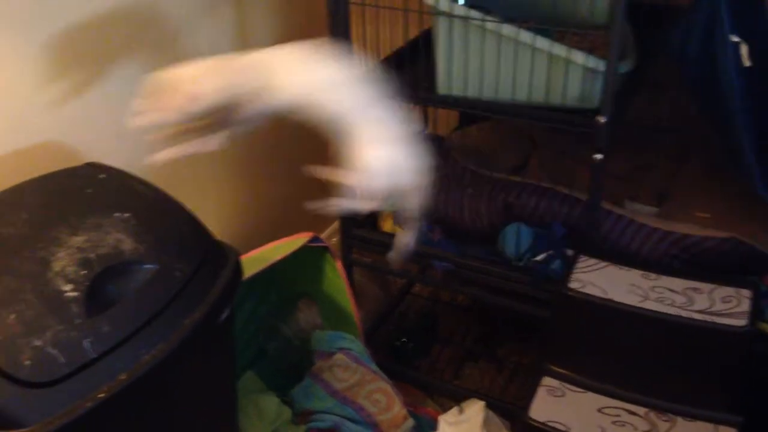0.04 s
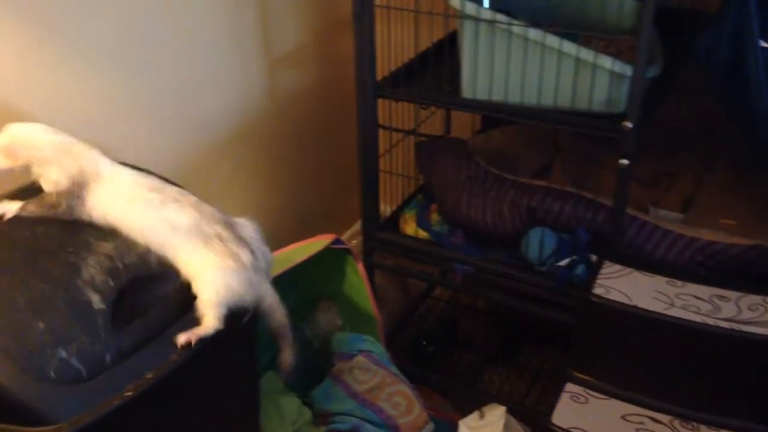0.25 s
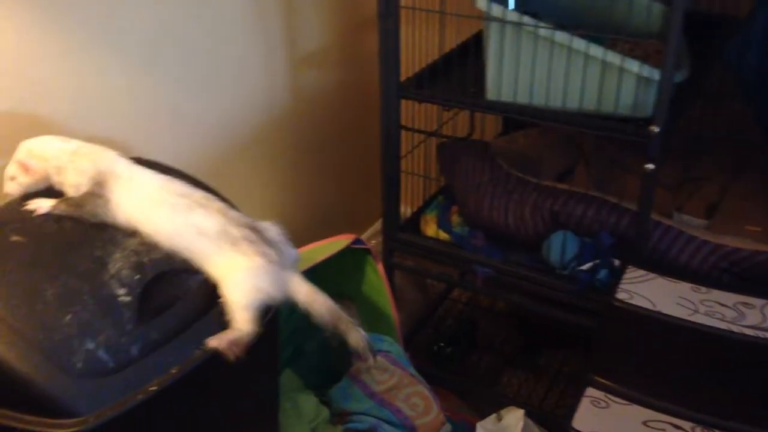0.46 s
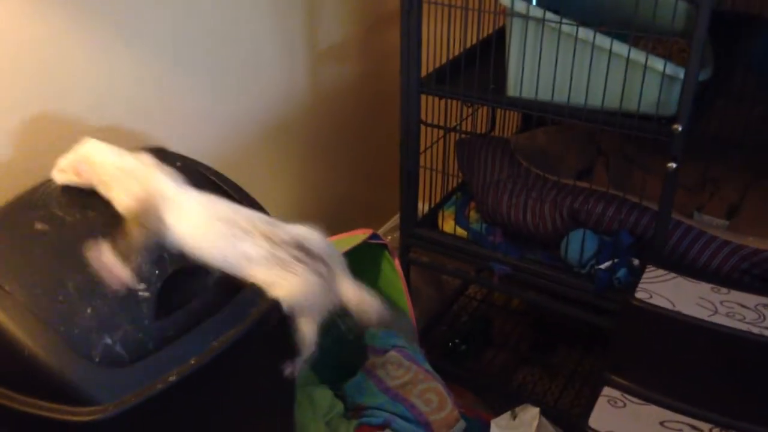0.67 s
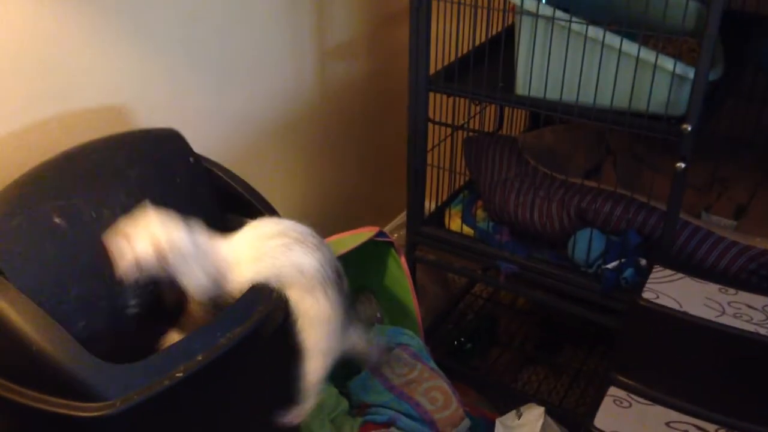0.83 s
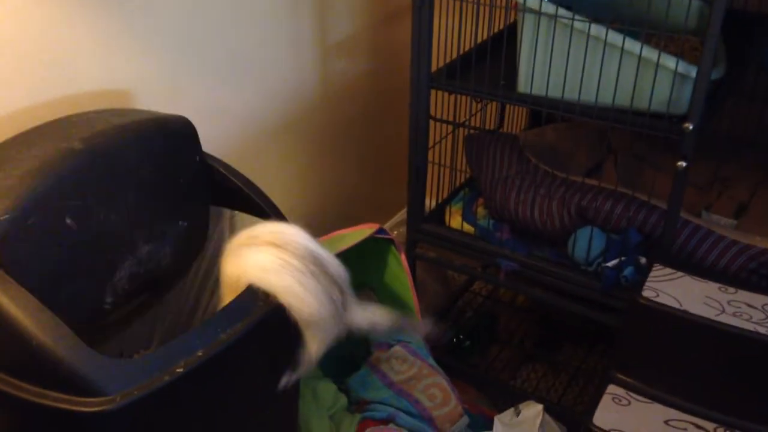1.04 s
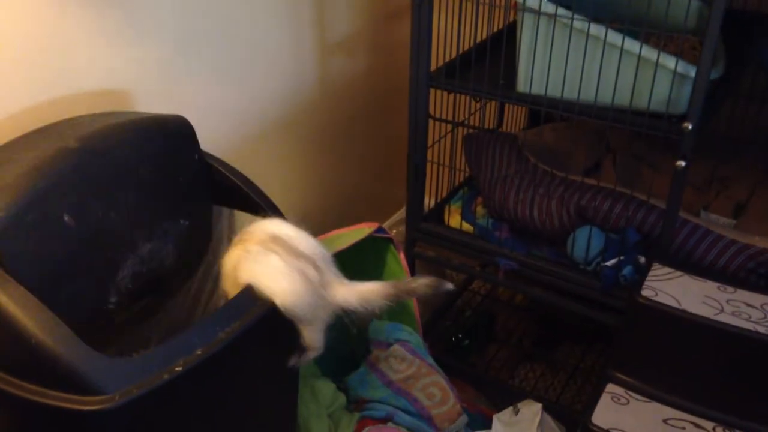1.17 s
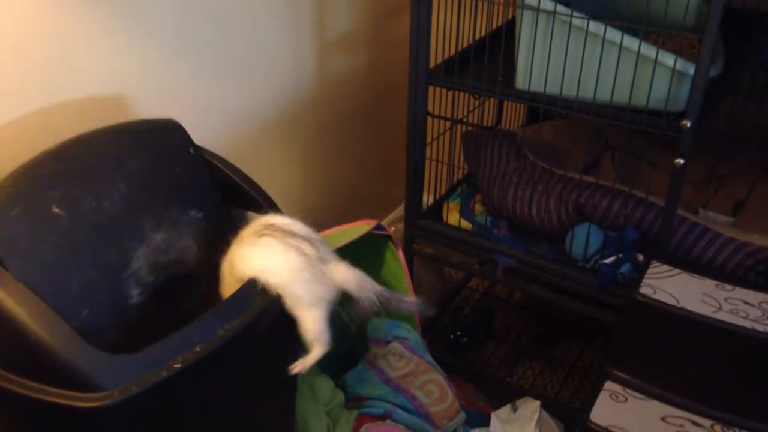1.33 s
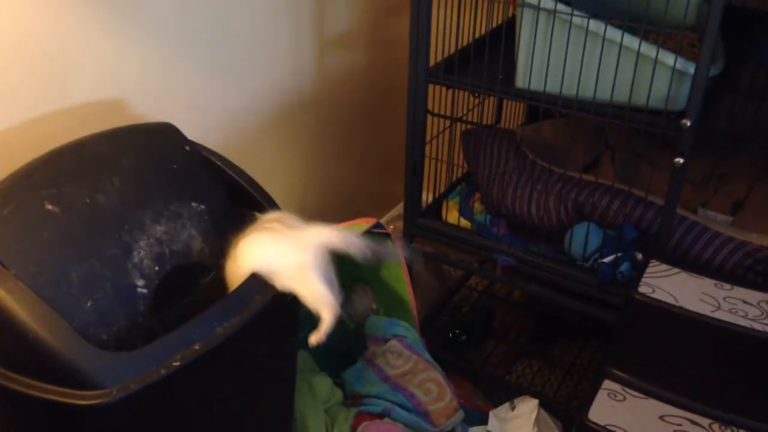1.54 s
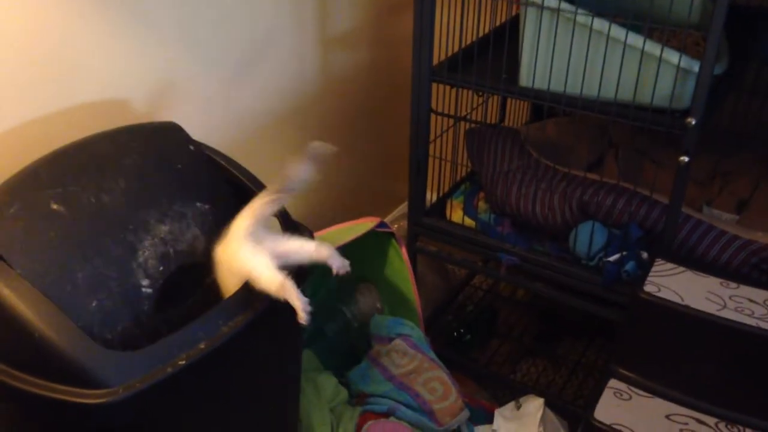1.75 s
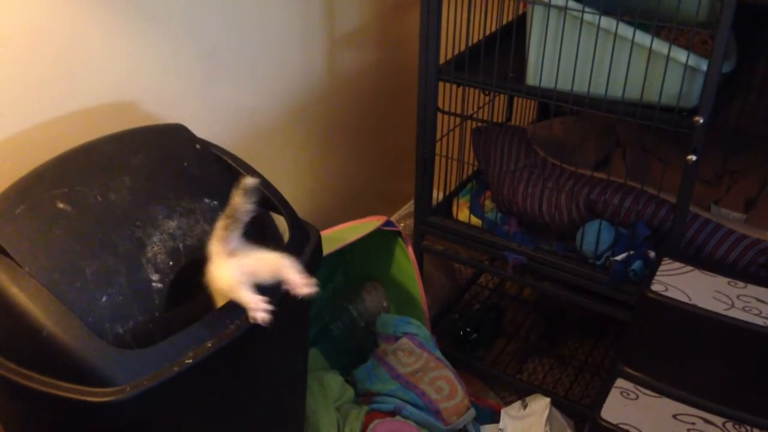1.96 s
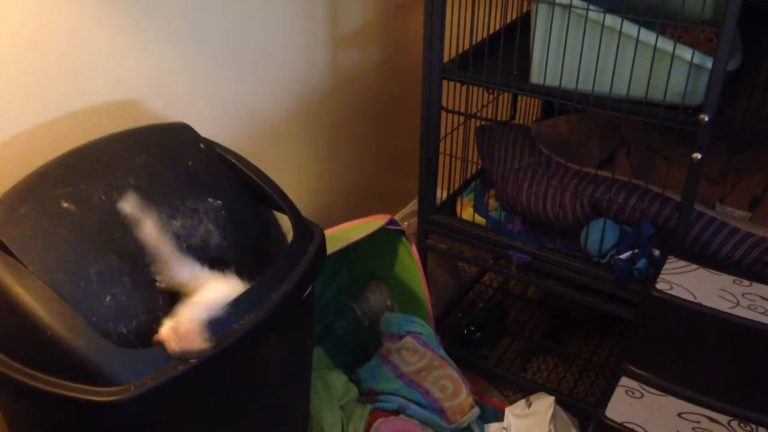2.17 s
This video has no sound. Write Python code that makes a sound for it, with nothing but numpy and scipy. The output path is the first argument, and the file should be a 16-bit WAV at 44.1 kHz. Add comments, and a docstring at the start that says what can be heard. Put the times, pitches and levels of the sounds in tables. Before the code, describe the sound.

Hollow knocks on a plastic bin as a ferret scrambles inside, claws ticking and fur rustling.

```python
"""In a small, quiet room, a ferret lands on a plastic bin, pushes through its swinging lid
and slides inside. Fur and liner rustle along the plastic, and claws tick, scrape and squeak.
Paws, body and lid knock the hollow shell, which rings while the loose lid rattles.
The microphone is close, and the walls add short echoes."""
import sys
import numpy as np
from scipy import signal
from scipy.fft import rfft, irfft
from scipy.io import wavfile
from scipy.ndimage import uniform_filter1d

SR = 44100
rng = np.random.default_rng(int(sys.argv[2]) if len(sys.argv) > 2 else 0)


def waveform_to_disk(signal):
    """Save audio, clipped to [-1, 1], as 16-bit WAV at the path in sys.argv[1]."""
    frames = np.transpose(np.atleast_2d(signal))
    scaled = np.clip(frames, -1, 1) * 32767
    samples = np.round(scaled).astype(np.int16)
    wavfile.write(sys.argv[1], SR, samples)


N = 97020  # 2.2 s
PANEL_HZ = 300  # panel fade times are given at this pitch; higher panels die away sooner


def amp(db):
    """Turns decibels into a number to multiply a sound by."""
    return 10 ** (np.asarray(db) / 20)


def unit(x):
    """Scales a sound to an average strength (rms) of 1."""
    return x / np.sqrt(np.mean(x ** 2) + 1e-20)


def read(points, hz):
    """Looks up a frequency in a table, blending between rows on a pitch (log) scale."""
    f, value = np.transpose(points)
    return np.interp(np.log(hz + 1), np.log(f), value)


def add(mix, s, sound):
    """Mixes a sound in, starting at s seconds."""
    part = mix[max(round(s * SR), 0):][:len(sound)]
    part += sound[:len(part)]


def colour(x, spectrum):
    """Shapes the lows and highs of a sound by a table, at strength 1."""
    gain = amp(read(spectrum, np.fft.rfftfreq(N, 1 / SR)))
    return unit(irfft(rfft(x) * gain, N))


def grains(per_s, spread_db):
    """Tiny clicks of uneven size, made as one surface slips over another."""
    clicks = rng.standard_normal(N) * (rng.random(N) < per_s / SR)
    return clicks * amp(spread_db * np.minimum(rng.exponential(1, N), 4))


def burst(hz, t, width_oct, skirt_db):
    """Noise gathered around one pitch, with a wide skirt of lower and higher sound."""
    octaves = np.log2((np.fft.rfftfreq(len(t), 1 / SR) + 1) / hz)
    peak = np.exp(-.5 * (octaves / width_oct) ** 2)
    skirt = amp(skirt_db - 10.5 * np.maximum(abs(octaves) - 1, 0))
    phases = np.exp(2j * np.pi * rng.random(len(peak)))
    return unit(irfft((peak + skirt) * phases, len(t)))


def rubbing():
    """Fur and liner hiss along the lid, over the rougher drag of the body on the shell."""
    # tone of the fur and liner: f/Hz, level/dB
    fur_tone = [(800, -22), (2500, -2.5), (4200, 1), (7500, -0.5), (10500, -4), (15000, -7.5)]
    # how their hiss swells and fades: t/s, level/dB
    fur_levels = [(0, -56), (.14, -67), (.215, -52.5), (.225, -42.5), (.29, -41), (.355, -51),
                  (.385, -44.5), (.45, -64), (.54, -60.5), (.585, -46.5), (.645, -39), (.725, -46.5),
                  (.78, -44), (.865, -37), (.905, -43.5), (.945, -37), (.975, -46.5), (1.02, -39.5),
                  (1.06, -43.5), (1.09, -54), (1.5, -63), (1.6, -59), (1.69, -49.5), (1.72, -64.5),
                  (1.88, -70.5), (1.935, -59), (2.0, -69.5), (2.03, -57), (2.08, -56.5), (2.12, -72)]
    # tone of the dragging body: f/Hz, level/dB
    drag_tone = [(90, 4), (200, 12.5), (450, 13.5), (1100, 13), (2000, 13), (3200, 7), (6000, -1),
                 (14000, -35)]
    # how the drag swells and fades: t/s, level/dB
    drag_levels = [(.15, -68), (.21, -58), (.23, -39.5), (.31, -42), (.54, -74.5), (.555, -43), (.62, -49),
                   (.79, -46), (.87, -42), (.905, -45.5), (.945, -45), (.975, -49), (1.02, -42.5),
                   (1.05, -49.5), (1.1, -50.5), (1.25, -58), (1.35, -52), (1.495, -59), (1.535, -41),
                   (1.59, -55.5), (1.88, -58.5), (2.165, -65.5), (2.178, -55)]
    t = np.arange(N) / SR
    fur = colour(grains(per_s=13000, spread_db=-2.5), fur_tone)
    drag = colour(grains(per_s=3500, spread_db=1.5), drag_tone)
    fur_gain = amp(np.interp(t, *np.transpose(fur_levels)) + 0.5)
    drag_gain = amp(np.interp(t, *np.transpose(drag_levels)) - 1)
    return fur * fur_gain + drag * drag_gain


def claws():
    """Claws tick on the plastic: bursts of noise that start sharply and fade fast."""
    # ticks and scratches: t/s, level/dB, brightest f/Hz, fade time/s
    ticks = [(.049, -40, 6000, 0.0012), (0.222, -15.5, 6640, 0.00067), (0.2391, -31, 2560, 0.0037),
             (0.487, -45, 3360, 0.011), (0.5672, -18, 4200, 0.0012), (0.7834, -18, 2180, 0.0011),
             (0.8606, -22, 4900, 0.0011), (1.283, -34.5, 1630, 0.0079), (1.387, -42, 5470, 0.005),
             (1.5094, -34.5, 1820, 0.0024), (1.5216, -37.5, 2040, 0.019), (1.767, -45, 3630, 0.01),
             (1.8, -47.5, 3300, 0.0077), (2.019, -37.5, 5030, 0.0038)]
    rise_s = 0.00075
    t, out = np.arange(SR // 8) / SR, np.zeros(N)
    for s, db, hz, decay in ticks:
        envelope = np.exp(-t / decay) * (1 - np.exp(-t / rise_s))
        add(out, s, amp(db) * burst(hz, t, width_oct=0.33, skirt_db=-6.5) * envelope)
    return out


def blows(rows, rise_cycles, decay_s, rattle_db):
    """Each blow bends one panel back and forth for a moment and rattles the loose lid."""
    rattle_fade_s = 0.016
    t, out = np.arange(SR // 4) / SR, np.zeros(N)
    for s, db, hz in rows:
        rise = 1 - np.exp(-t * hz / rise_cycles)
        fade = np.exp(-t * np.sqrt(hz / PANEL_HZ) / decay_s)
        flex = np.sin(2 * np.pi * hz * t) * rise * fade
        rattle = burst(hz, t, width_oct=0.7, skirt_db=3) * rise * np.exp(-t / rattle_fade_s)
        add(out, s, amp(db) * (flex / abs(flex).max() + amp(rattle_db) * rattle))
    return out


def knocks():
    """Paws, lid and body strike the bin; softer blows build up and fade more slowly."""
    # hard knocks of paws and lid: t/s, level/dB, panel f/Hz
    hard_hits = [(0.157, -45, 293), (0.2125, -28, 360), (.2275, -27.5, 700), (.246, -27.5, 345),
                 (.286, -23, 373), (.308, -30, 424), (.601, -23, 340), (.612, -26.5, 864), (.660, -30, 268),
                 (.755, -28, 440), (.784, -24.5, 633), (.848, -27.5, 1070), (1.0768, -21, 340),
                 (1.0835, -27, 352), (1.0915, -21.5, 557), (1.1012, -33, 576), (1.510, -24.5, 470),
                 (1.5163, -33, 505), (1.525, -28.5, 1040), (1.5313, -30.5, 650), (1.536, -28, 360),
                 (1.5495, -40, 520), (2.020, -34, 410)]
    # soft bumps of the body: t/s, level/dB, panel f/Hz
    body_bumps = [(.238, -28.5, 150), (.275, -28, 100), (.319, -28.5, 191), (.614, -34, 234),
                  (.655, -39, 88), (.878, -42.5, 145), (1.119, -34.5, 263), (1.534, -34.5, 135),
                  (1.682, -43, 460), (1.9225, -27.5, 238), (1.963, -36, 224), (1.986, -41.5, 504)]
    # round taps of a paw pad: t/s, level of each of two layers/dB, panel f/Hz
    pad_taps = [(.4855, -36, 518), (1.246, -44, 450), (1.8015, -43, 950)]
    out = blows(hard_hits, rise_cycles=0.15, decay_s=0.0029, rattle_db=-12)
    out += blows(body_bumps, rise_cycles=0.99, decay_s=0.0053, rattle_db=-6)
    for _ in range(2):
        out += blows(pad_taps, rise_cycles=0.7, decay_s=0.0045, rattle_db=-17)
    return out


def shell(hits):
    """The hollow shell adds its own ringing notes to every hit."""
    # notes of the shell: f/Hz, level before the high notes are lifted/dB
    notes = [(101, -13), (130, 0), (175, 0), (232, 7.5), (280, 7.5), (366, 8), (474, 4), (520, 3.5),
             (615, 9), (735, 8.5), (1040, 5.5)]
    ring_s = 0.077  # time for the low notes to fall by 60 dB
    t, ring = np.arange(SR // 2) / SR, np.zeros(SR // 2)
    for hz, db in notes:
        fall_db = 60 * t / ring_s * max(1, np.sqrt(hz / PANEL_HZ))
        ring += amp(db - fall_db) * np.sqrt(hz) * np.cos(2 * np.pi * hz * t)
    return hits + 2.66 / SR * signal.fftconvolve(hits, ring)[:N]


def scrapes():
    """Claws scrape along the lid in gritty swells of tiny, sharp slips."""
    # scrapes: middle t/s, level/dB, brightest f/Hz, half length/s
    strokes = [(0.271, -40, 11600, 0.037), (0.66, -42, 7150, 0.041), (0.772, -37, 8100, 0.033),
               (0.825, -40.5, 11800, 0.032), (0.938, -40, 1640, 0.0097), (1.147, -51, 2570, 0.018)]
    width_oct = 0.61
    t, out = np.arange(N) / SR, np.zeros(N)
    f = np.fft.rfftfreq(N, 1 / SR) + 1
    for s, db, hz, half_length in strokes:
        slips = grains(per_s=2200, spread_db=1)
        band = np.exp(-.5 * (np.log2(f / hz) / width_oct) ** 2)
        grit = unit(irfft(rfft(slips) * band, N))
        out += amp(db) * grit * np.exp(-((t - s) / half_length) ** 2)
    return out


def squeaks():
    """A claw sticks and slips on the plastic, making a brief, wavering note."""
    # squeaks: middle t/s, level/dB, f/Hz, half length/s
    chirps = [(1.522, -38, 5450, 0.0021), (1.769, -43.5, 3740, 0.0037)]
    t, out = np.arange(N) / SR, np.zeros(N)
    for s, db, hz, half_length in chirps:
        waver = 0.073 * unit(uniform_filter1d(rng.standard_normal(N), size=40))
        tone = np.sin(2 * np.pi * np.cumsum(hz * (1 + waver)) / SR)
        out += amp(db) * tone * np.exp(-abs(t - s) / half_length)
    return out


def room(x):
    """Adds two wall echoes and a short wash of sound, all dulled by soft furnishings."""
    # how long the room rings: f/Hz, time to fall by 60 dB/s
    ring_times = [(100, 0.36), (1500, 0.095), (14000, 0.15)]
    # echoes from nearby walls: delay/s, gain
    walls = [(.0068, 0.094), (0.0159, 0.23)]
    build_s, absorb_hz = 0.0058, 2140
    t = np.arange(SR // 2) / SR
    hz, age, noise = signal.stft(rng.standard_normal(len(t)), SR, nperseg=256)
    fade = amp(-60 * age / read(ring_times, hz)[:, None])
    tail = signal.istft(noise * fade, SR, nperseg=256)[1][:len(t)]
    tail *= 1 - np.exp(-(t / build_s) ** 2)
    echoes = amp(-7.5) * tail / np.linalg.norm(tail)
    for delay, gain in walls:
        add(echoes, delay, np.array([gain]))
    dulled = signal.lfilter(*signal.butter(1, absorb_hz, fs=SR), echoes)
    return x + signal.fftconvolve(x, dulled)[:N]


def scene():
    """The ferret and the bin in their room, over faint background noise."""
    # tone of the room's low, steady noise: f/Hz, level/dB
    air_tone = [(20, -4.5), (72, -1), (170, -5), (500, -16.5), (15000, -42.5)]
    ferret = room(shell(knocks()) + claws() + squeaks() + scrapes() + rubbing())
    air = amp(-62) * colour(rng.standard_normal(N), air_tone)
    return (ferret + air)[None]


def record(dry):
    """The microphone loses the deepest bass and the highest treble."""
    low_hz, high_hz = 60, 15450
    thin = signal.sosfilt(signal.butter(2, low_hz, "high", fs=SR, output="sos"), dry)
    treble_cut = signal.firwin(511, high_hz, window=("kaiser", 9), fs=SR)
    return signal.oaconvolve(thin, treble_cut[None], "same")


dry = scene()
out = record(dry)
waveform_to_disk(out)
```